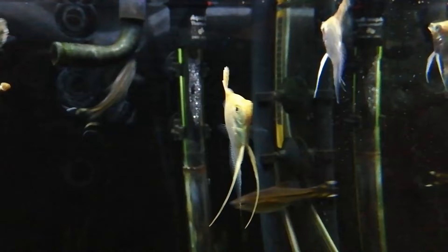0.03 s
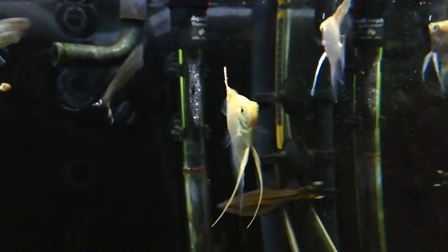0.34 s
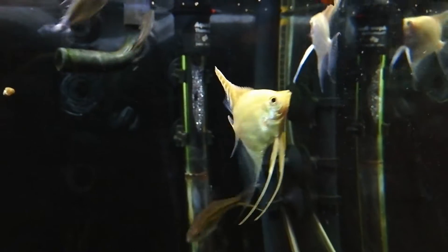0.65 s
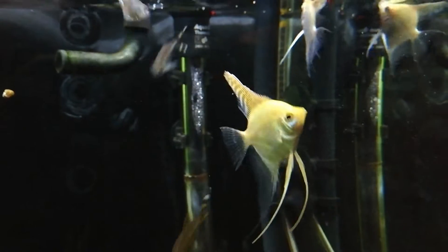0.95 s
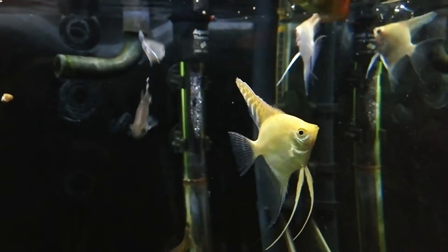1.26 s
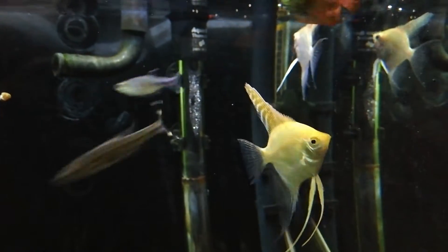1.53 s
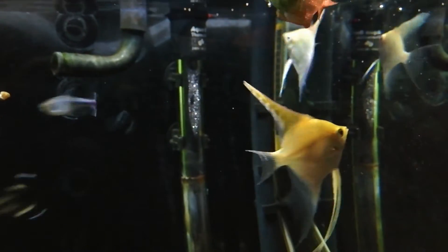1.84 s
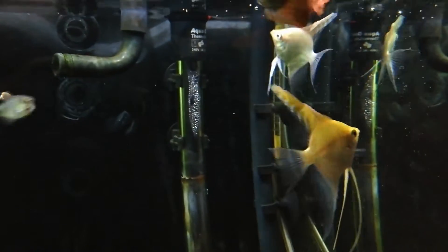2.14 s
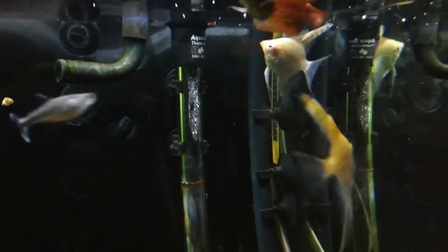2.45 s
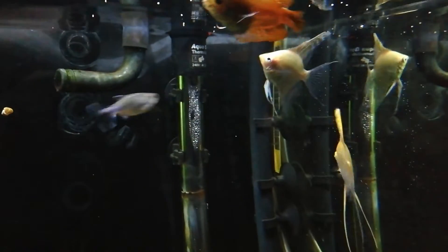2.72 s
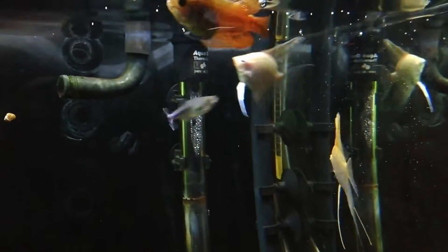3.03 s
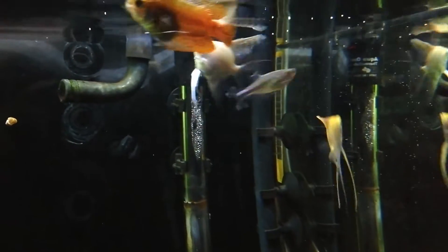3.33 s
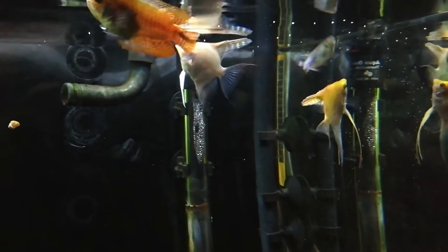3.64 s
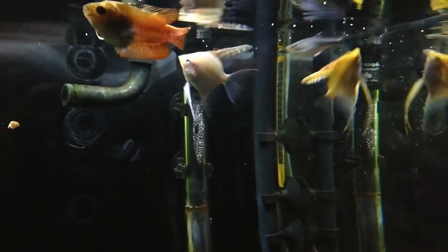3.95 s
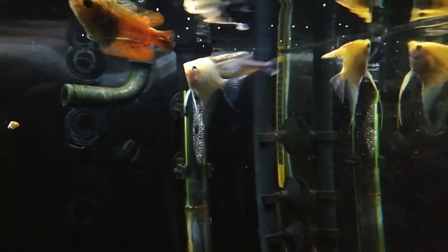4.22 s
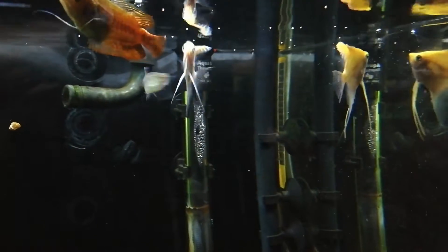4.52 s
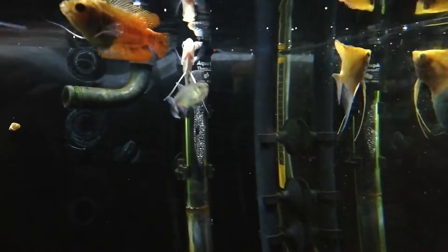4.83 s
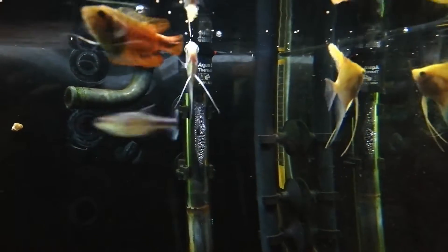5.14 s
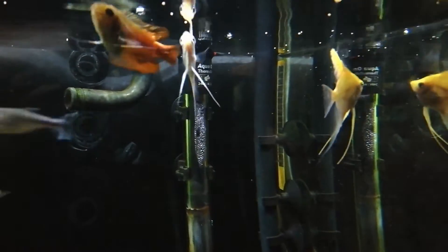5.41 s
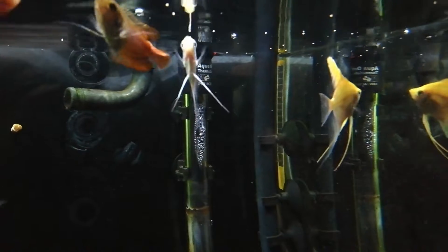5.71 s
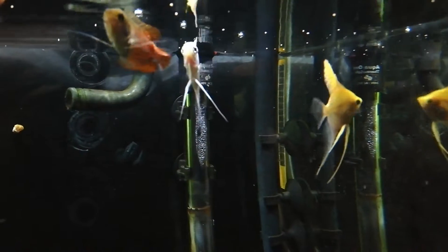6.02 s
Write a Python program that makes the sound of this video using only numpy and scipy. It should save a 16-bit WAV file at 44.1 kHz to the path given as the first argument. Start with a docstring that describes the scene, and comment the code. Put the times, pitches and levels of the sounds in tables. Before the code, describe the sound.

A microphone switches on with a soft pop, then quiet aquarium pumps hum under a low rumble and thin, even hiss.

```python
"""A home aquarium in a quiet room, on a stereo pair of microphones just in front of the glass.
After a moment's silence the microphones switch on with a soft pop. A short patch of low noise fades.
Pumps hum on the mains over a low rumble, an even hiss, a thin whine and the sizzle of the finest bubbles.
Faint cheeps and a few ticks from the water's surface come and go; about four seconds in there is one
brief, high fizz on the left, and near the end something bumps softly."""
import sys
import numpy as np
from scipy import signal
from scipy.fft import rfft, irfft, next_fast_len
from scipy.io import wavfile

SR = 44100
rng = np.random.default_rng(int(sys.argv[2]) if len(sys.argv) > 2 else 0)


def file_out(sig):
    """Save sig as 16-bit WAV at sys.argv[1]."""
    # one column per channel
    cols = np.atleast_2d(sig).T
    # limit, then scale
    lim = np.clip(cols, -1, 1)
    pcm = np.round(lim * 32767).astype(np.int16)
    wavfile.write(sys.argv[1], SR, pcm)


N = 272097
TIME = np.arange(N) / SR
SWITCH_ON_S, MAINS_HZ = .42445, 50

# pump hum: multiple of the mains, rms level/dB, left minus right/dB
PUMP_HARMONICS = [(3, -66, -1), (4, -86.5, -1), (6, -87.5, -3), (8, -91, -6), (10, -92, 4), (12, -92.5, 7),
                  (16, -87, 10)]
# motor tones off the mains: f/Hz, rms level/dB, left minus right/dB
MOTOR_TONES = [(82, -86, 0.5), (120.8, -85.5, 1), (311.7, -76, -2), (364.6, -86, -2), (456, -90, -2),
               (525, -92.5, -2), (730, -88, -1), (769, -91.5, 12), (1040, -90.5, 6.5), (1254, -98, 4)]
# spectra of the equipment's rumble and of the hiss above it: f/Hz, relative level/dB
RUMBLE_SPECTRUM = [(15, -8), (25, -13.5), (40, -14), (70, -14.5), (84, -11), (135, -8.5), (200, -7.5),
                   (250, -9.5), (305, -13.5), (335, -16.5), (430, -16.5), (510, -15), (690, -18),
                   (865, -17), (990, -18), (1070, -16), (1135, -19.5), (1300, -21.5), (1530, -23.5),
                   (1830, -23), (2200, -30), (2600, -51.5)]
HISS_SPECTRUM = [(1400, -25), (2100, -2), (3300, -1.5), (4900, -4), (5300, -5.5), (7900, -5), (8650, -4.5),
                 (9050, -3.5), (9500, -5.5), (10700, -9.5), (12500, -11), (15700, -13.5)]
# how alike the room sounds at the two microphones: f/Hz, likeness (1 or more is identical)
MIC_LIKENESS = [(30, 1.4), (110, 1), (230, 0.9), (300, 0.5), (420, 0.19), (720, -0.51), (1000, -0.2),
                (1550, 0.14), (2400, -0.11), (4000, 0)]
# which microphone the room's noise favours: f/Hz, left minus right/dB
MIC_BALANCE = [(200, 0.1), (450, -.5), (620, 2), (820, 5), (1100, 2.5), (1500, 0.5), (3000, 0.1)]
# rings of the finest bubbles: f/Hz, width/Hz, relative level/dB
SIZZLE_RINGS = [(8600, 200, -2.5), (9400, 350, -1.5), (10600, 500, -3)]
# faint cheeps in the treble: t/s, peak level/dB
CHEEP_EVENTS = [(.70, -78), (1.46, -81), (2.63, -82), (2.98, -81), (3.72, -81), (4.53, -80), (5.3, -77),
                (6.03, -80)]
# ticks at the water's surface: t/s, level/dB, ring f/Hz, ring width/Hz
SURFACE_TICKS = [(1.699, -72, 4600, 700), (1.71, -63, 1250, 400), (4.147, -62, 3600, 1800),
                 (4.16, -66, 3130, 400), (4.21, -64, 4550, 250), (5.046, -68, 4300, 700),
                 (5.465, -69, 4480, 700), (5.882, -69, 4540, 700)]
# spectrum of a tick's broad part: f/Hz, relative level/dB
TICK_SPECTRUM = [(600, -11), (1300, 16), (2200, -6), (3200, 3), (4600, 2), (6000, 1), (9000, -11),
                 (15000, -28)]
# resonances of the fizz: f/Hz, width/Hz, relative level/dB
FIZZ_RINGS = [(7450, 910, -8), (8100, 220, 0), (8560, 380, -2), (9000, 220, 2.5), (9660, 600, -9),
              (10300, 150, -11), (11500, 2500, -25), (15000, 1400, -21)]
# soft bumps: t/s, level/dB
BUMP_EVENTS = [(6.1226, -45.5), (6.155, -54)]
# modes that a bump sets ringing: f/Hz, relative level/dB, t60/s
BUMP_RINGS = [(148, -3.5, 0.12), (294, -3, 0.052), (1050, -8, 0.012), (3000, -18, .008)]


def from_db(db):
    """Decibels to gain."""
    return 10 ** (np.asarray(db) / 20)


def rms_one(x):
    """Scale to an rms of 1."""
    return x / np.sqrt(np.mean(x ** 2) + 1e-20)


def pan(lean_db):
    """Gains at the two microphones; a positive lean is to the left."""
    return from_db(np.array([[.5], [-.5]]) * lean_db)


def at_hz(points, hz):
    """Read a table on a log-frequency axis."""
    known_hz, values = np.transpose(points)
    return np.interp(np.log(hz + 1e-9), np.log(known_hz), values)


def drift(per_s):
    """A random wander of rms 1 that takes a new course `per_s` times a second."""
    knots = rng.standard_normal(4096)
    return rms_one(np.interp(TIME * per_s, np.arange(len(knots)), knots))


def resonance(x, hz, width_hz):
    """Two-pole resonance with gain 1 at its peak."""
    r = np.exp(-np.pi * width_hz / SR)
    feedback = [1, -2 * r * np.cos(2 * np.pi * hz / SR), r * r]
    return signal.lfilter(np.array([1, 0, -1]) * (1 - r * r) / 2, feedback, x + 1e-18)


def ring(clicks, hz, t60):
    """A unit click sets a sine of height 1 ringing."""
    r, w = np.exp(-np.log(1000) / (t60 * SR)), 2 * np.pi * hz / SR
    return signal.lfilter([0, np.sin(w)], [1, -2 * r * np.cos(w), r * r], clicks + 1e-18)


def room_noise(spectrum):
    """Diffuse noise of rms 1: alike at both microphones in the bass, unrelated in the treble."""
    size = next_fast_len(N)
    hz = np.arange(size // 2 + 1) * SR / size
    mid, side = rfft(rng.standard_normal((2, size)))
    alike = np.clip(at_hz(MIC_LIKENESS, hz), -1, 1)
    pair = np.sqrt(1 + alike) * mid + np.sqrt(1 - alike) * side * [[1], [-1]]
    coloured = pair * from_db(at_hz(spectrum, hz)) * pan(at_hz(MIC_BALANCE, hz))
    return rms_one(irfft(coloured, size)[:, :N])


def switch_pop(offset_db=-22, rise_s=.00004, settle_s=.088, rebound_s=.00047, rebound_width_s=.00036):
    """The input's bias jumps, springs partly back for an instant, then drains through its capacitor."""
    age = np.maximum(TIME - SWITCH_ON_S, 0)
    edge = 1 - np.exp(-(age / rise_s) ** 2)
    rebound = .41 * pan(lean_db=-6) * np.exp(-((age - rebound_s) / rebound_width_s) ** 2)
    return from_db(offset_db) * edge * (rebound - np.exp(-age / settle_s))


def low_noise_fade(hz=80, width_hz=70, level_db=-56, fade_db_per_s=75):
    """A short, fading patch of low, grainy noise near 80 Hz."""
    age = np.maximum(TIME - SWITCH_ON_S, 0)
    low = resonance(resonance(rng.standard_normal(N), hz, width_hz), hz, width_hz)
    return from_db(level_db - fade_db_per_s * age) * rms_one(low)


def hum_tone(hz, slip_rad, waver_db=.4, in_step_below_hz=340):
    """One wavering motor tone; the higher ones reach the two microphones out of step."""
    alike = np.clip(at_hz(MIC_LIKENESS, hz), -1, 1)
    apart = np.arccos(alike) * np.array([[.5], [-.5]]) if hz > in_step_below_hz else 0
    phase = 2 * np.pi * (hz * TIME + rng.random()) + slip_rad * drift(2.3)
    return np.sqrt(2) * np.sin(phase + apart) * from_db(waver_db * drift(5.5))


def pump_hum():
    """Pumps locked to the mains hold their pitch; the other motor tones wander."""
    locked = sum(from_db(db) * pan(lean_db) * hum_tone(multiple * MAINS_HZ, slip_rad=0)
                 for multiple, db, lean_db in PUMP_HARMONICS)
    wandering = sum(from_db(db) * pan(lean_db) * hum_tone(hz, slip_rad=.23)
                    for hz, db, lean_db in MOTOR_TONES)
    return locked + wandering


def room_tone(rumble_db=-61.5, hiss_db=-68):
    """The equipment's low rumble fills the room, with a thin, even hiss above it."""
    rumble = from_db(rumble_db) * room_noise(RUMBLE_SPECTRUM)
    hiss = from_db(hiss_db) * room_noise(HISS_SPECTRUM)
    return rumble + hiss


def whine(hz=10265, width_hz=80, level_db=-87, throb_db=5, throbs_per_s=10.8, slip_rad=1.6):
    """A thin whine, nearer the right microphone, that throbs unevenly."""
    narrow = resonance(rng.standard_normal((2, N)), hz, width_hz)
    throb = np.sin(2 * np.pi * throbs_per_s * TIME + slip_rad * drift(3.3))
    return from_db(level_db) * pan(lean_db=-7) * rms_one(narrow * from_db(throb_db * throb))


def bubble_sizzle(base_per_s=140, clump_db=4, gain_db=-84.5):
    """The finest bubbles burst in loose clumps, each a tiny click with a short, high ring."""
    out = 0
    for hz, width_hz, db in SIZZLE_RINGS:
        bursts = rng.random(N) < base_per_s * from_db(clump_db * drift(9)) / SR
        clicks = bursts * rng.uniform(-1.2, 1, (2, N))
        out = out + from_db(db) * rms_one(resonance(clicks, hz, width_hz))
    return from_db(gain_db) * out


def cheeps(top_hz=11000, fall_hz_per_s=11000, length_s=.06, waver_hz=150):
    """Very thin, unsteady whistles, right of centre, that slide down as they swell and fade."""
    out = np.zeros(N)
    waver = waver_hz * drift(per_s=180)
    for s, db in CHEEP_EVENTS:
        age = np.clip(TIME - s, 0, length_s)
        phase = 2 * np.pi * np.cumsum(top_hz - fall_hz_per_s * age + waver) / SR
        out += from_db(db) * np.sin(np.pi * age / length_s) * np.sin(phase)
    return pan(lean_db=-4) * out


def surface_ticks(broad_db=-4.5, ring_db=-.5, t60_s=.095):
    """Tiny pops at the surface, smeared by the room: a broad tick, a rough ring at the bubble's pitch."""
    broad = from_db(broad_db) * room_noise(TICK_SPECTRUM)
    white = rng.standard_normal((2, N))
    out = 0
    for s, db, hz, width_hz in SURFACE_TICKS:
        age = np.maximum(TIME - s, 0)
        envelope = from_db(db) * (age > 0) * np.exp(-np.log(1000) * age / t60_s)
        rough_ring = from_db(ring_db) * rms_one(resonance(white, hz, width_hz))
        out = out + envelope * (broad + rough_ring)
    return out


def fizz(start_s=4.146, level_db=-58, clicks_per_s=9000, leak_s=.015, leak_db=-10,
         attack_s=.0024, hold_s=.025, fade_db_per_s=230):
    """A spurt of tiny ringing clicks from the water on the left: it leaks, breaks through, holds, dies."""
    clicks = (rng.random((2, N)) < clicks_per_s / SR) * rng.standard_normal((2, N))
    rings = sum((-1) ** k * from_db(db) * resonance(clicks, hz, width_hz)
                for k, (hz, width_hz, db) in enumerate(FIZZ_RINGS))
    age = TIME - start_s
    leak = from_db(leak_db) * np.clip((age + leak_s) / attack_s, 0, 1)
    spurt = np.clip(age / attack_s, 0, 1)
    fade = from_db(-fade_db_per_s * np.maximum(age - hold_s, 0))
    return from_db(level_db) * np.maximum(leak, spurt) * fade * pan(lean_db=6) * rms_one(rings)


def bumps():
    """Two soft, dull knocks in quick succession, equal at both microphones, that soon die away."""
    pushes = np.zeros(N)
    for s, db in BUMP_EVENTS:
        pushes[round(s * SR)] = -from_db(db)
    return sum(from_db(db) * ring(pushes, hz, t60) for hz, db, t60 in BUMP_RINGS)


def scene():
    """What reaches the front of the glass: the steady bed, with the small sounds on top."""
    bed = room_tone() + pump_hum() + whine() + bubble_sizzle()
    return bed + cheeps() + surface_ticks() + fizz() + bumps()


def record(dry):
    """Silence until the microphones switch on with a pop; the top is cut steeply at 15.7 kHz."""
    live = (dry + switch_pop() + low_noise_fade()) * (TIME >= SWITCH_ON_S)
    top_cut = signal.ellip(10, .1, 70, 15700, fs=SR, output="sos")
    return signal.sosfilt(top_cut, live)


dry = scene()
out = record(dry)
file_out(out)
```